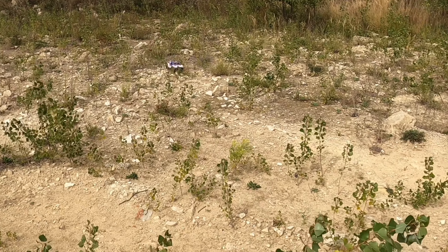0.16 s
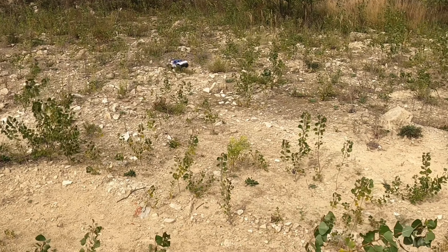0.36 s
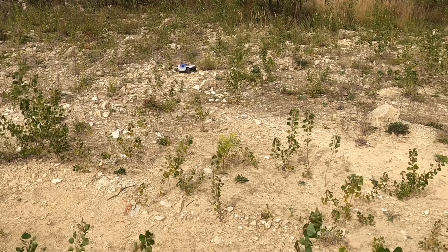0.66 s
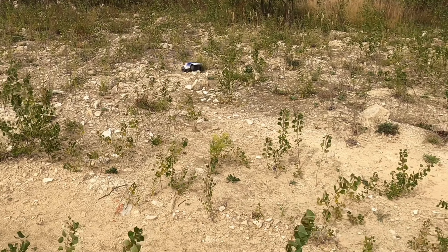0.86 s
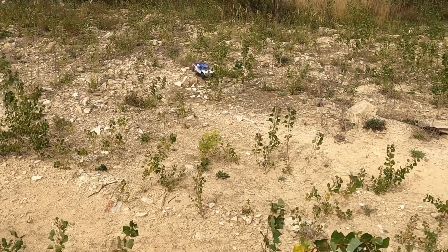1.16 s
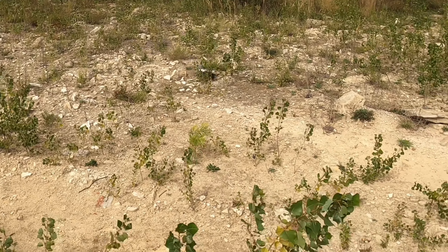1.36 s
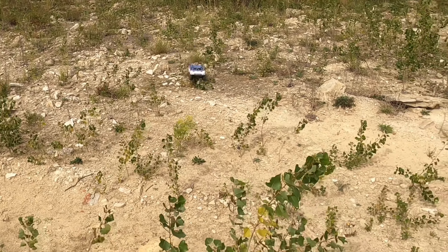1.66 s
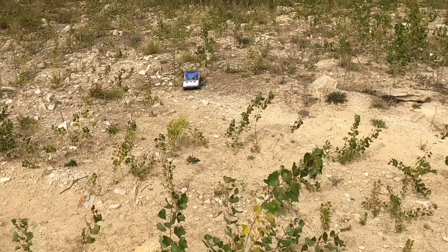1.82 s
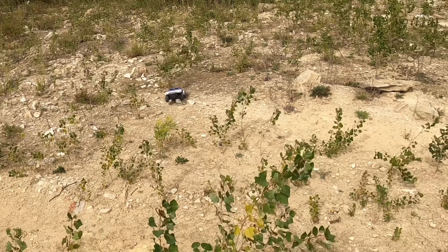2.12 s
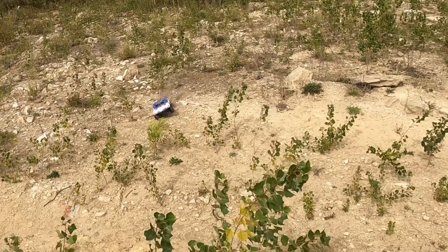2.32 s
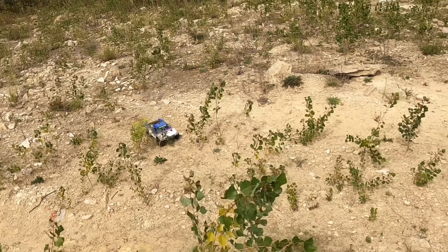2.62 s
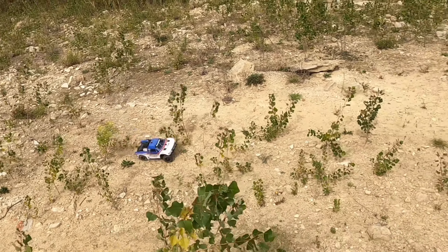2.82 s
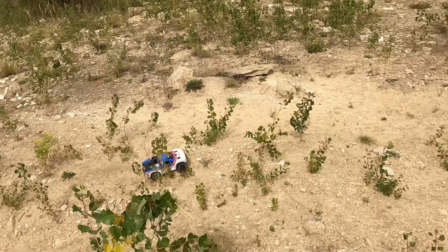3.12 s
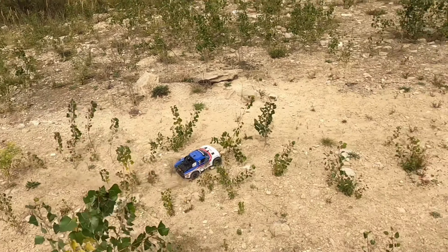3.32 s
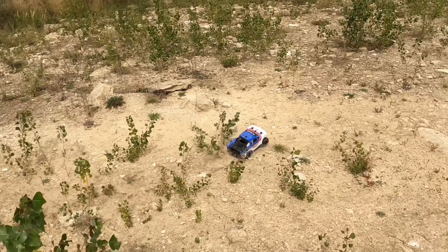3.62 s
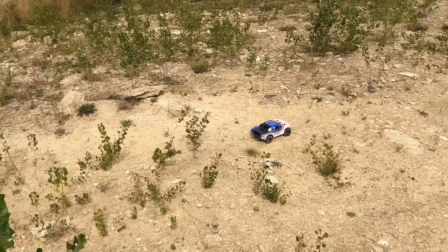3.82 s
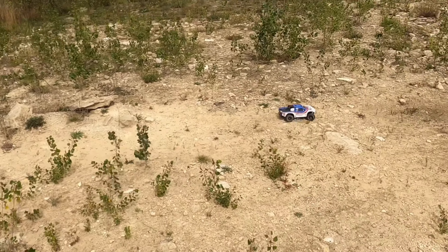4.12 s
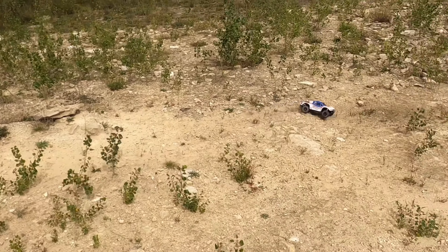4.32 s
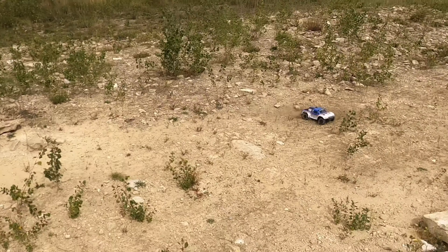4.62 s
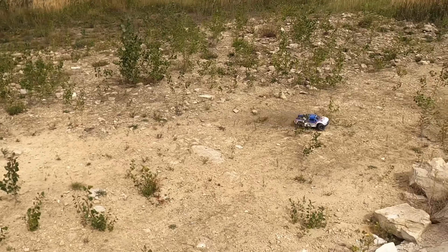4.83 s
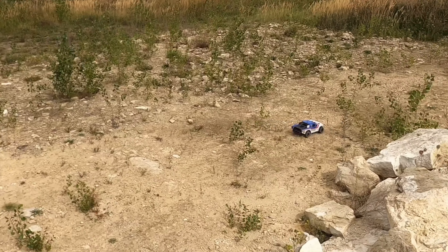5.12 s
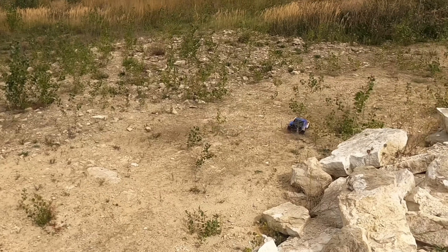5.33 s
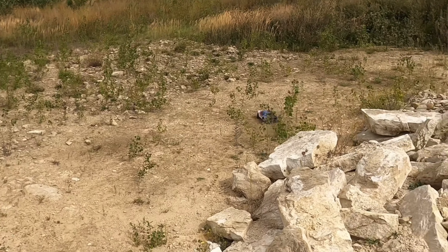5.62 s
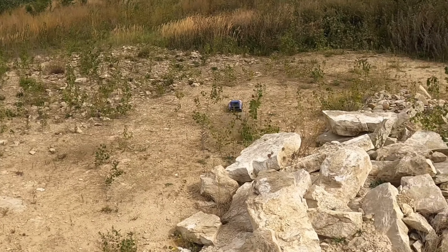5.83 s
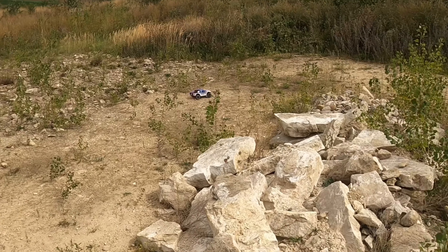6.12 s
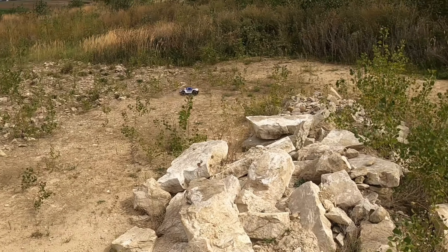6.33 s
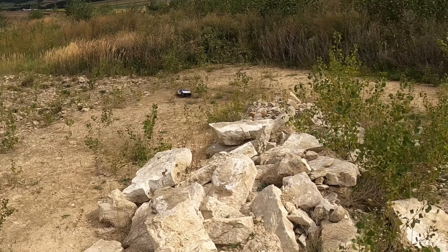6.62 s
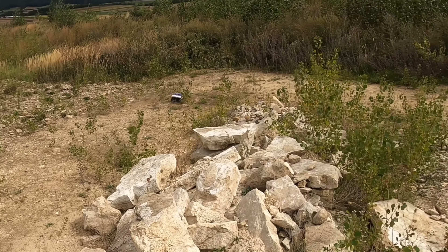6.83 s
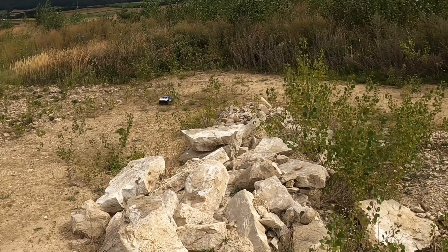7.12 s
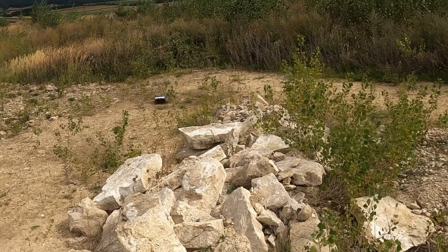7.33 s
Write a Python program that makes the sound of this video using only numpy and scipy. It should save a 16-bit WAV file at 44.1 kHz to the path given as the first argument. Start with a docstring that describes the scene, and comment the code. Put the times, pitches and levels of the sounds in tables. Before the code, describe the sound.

High motor and gear whine surges again and again as a little off-road truck hisses and rattles over grit, then fades under growing wind gusts.

```python
"""Outdoors on sand and stones, in wind: a small electric off-road truck runs before one mono microphone.
Its whine, motor and gear tones, starts high, sinks within a second, then surges again and again; a thin
coil whistle follows the controller's switching. Tyres and grit hiss, rasp and rumble as shaped noise, hardest
from about 3 to 4.5 s, while stones knock the resonant plastic shell. From 4 s lumpy low-frequency wind noise
grows on the microphone; near 7 s the truck is quieter and the gusts go on to the end."""
import sys
import numpy as np
from scipy import signal
from scipy.fft import rfft, irfft, next_fast_len
from scipy.io import wavfile
from scipy.ndimage import uniform_filter1d, map_coordinates

SR = 44100
rng = np.random.default_rng(int(sys.argv[2]) if len(sys.argv) > 2 else 0)


def int16_out(signal):
    """Quantize to a 16-bit WAV file."""
    q = np.round(np.clip(np.atleast_2d(signal).T, -1, 1) * 32767)
    wavfile.write(sys.argv[1], SR, q.astype(np.int16))


N = 328986

# Wind at the microphone: start_s, buffet_db, flutter_db (relative to the buffet)
WIND_LEVELS = [(0.0, -39, 6), (0.06, -23.5, -8.5), (0.21, -38, -8), (0.39, -34.5, -11), (0.56, -31, -5),
               (0.6, -22, -5), (0.79, -40, -7.5), (1.1, -25, -8.5), (1.29, -30, -16), (1.33, -46, 1.5),
               (1.43, -30.5, -9.5), (1.58, -48.5, -6), (2.01, -37.5, -8), (2.06, -44, -2),
               (2.35, -30.5, -9), (2.43, -21.5, -28), (2.47, -26.5, -12.5), (3.07, -38.5, -6),
               (3.12, -28, -8.5), (3.18, -53, 12.5), (3.28, -44.5, -1.5), (3.66, -30.5, -1.5),
               (3.74, -25.5, -3), (3.8, -21.5, -25), (3.95, -29.5, -15), (3.99, -47, 1), (4.05, -20, -8),
               (4.09, -31.5, -8.5), (4.24, -26.5, -2.5), (4.3, -30.5, -8), (4.45, -20, -1),
               (4.86, -25.5, -15.5), (4.88, -22.5, -16.5), (4.97, -23, -5.5), (5.05, -19.5, -20),
               (5.15, -39, -2), (5.38, -24.5, -14), (5.48, -23, 1.5), (5.59, -24, -17), (5.74, -30.5, 1.5),
               (5.77, -23.5, 0.5), (5.86, -27.5, -8.5), (6.0, -20, -0.5), (6.19, -20.5, 0),
               (6.3, -19.5, -7), (6.38, -22.5, 2.5), (6.46, -17, -15.5), (6.54, -20, -4.5), (6.59, -19, -5),
               (6.82, -24.5, -23), (6.94, -20, -16.5), (7.04, -24, -5.5), (7.1, -19.5, -18),
               (7.27, -34.5, 8.5), (7.31, -19.5, -5.5), (7.46, -25.5, 4)]
# Spectrum of the low wind buffet: frequency_hz, relative_level_db (per Hz)
BUFFET_SPECTRUM = [(12, -11), (25, 3), (45, 3), (80, -2), (130, -8), (250, -32), (400, -74)]
# Spectrum of the slightly higher wind flutter: frequency_hz, relative_level_db (per Hz)
FLUTTER_SPECTRUM = [(70, -1), (120, 0.5), (200, -3), (300, -13), (500, -29), (900, -78)]
# Rolling noise before the jolts: start_s, gear_rasp_db, chassis_rumble_db, thrown_sand_db
ROLLING_LEVELS = [(0.0, -41.5, -45, -58), (0.14, -41.5, -38.5, -60), (0.23, -47.5, -52, -69),
                  (0.35, -47.5, -39, -64), (0.54, -42, -47, -63.5), (0.73, -48, -34, -60.5),
                  (0.77, -57, -44, -77), (0.83, -47.5, -48.5, -86), (0.87, -56, -38.5, -59),
                  (0.89, -45, -41, -66), (0.98, -46.5, -47.5, -70), (1.14, -38, -39.5, -56.5),
                  (1.39, -41.5, -43, -68), (1.41, -35.5, -31, -62), (1.56, -43.5, -50.5, -61),
                  (1.6, -42, -42, -60), (1.7, -36.5, -47.5, -56), (1.95, -42, -41, -54.5),
                  (1.97, -34.5, -34.5, -48), (2.12, -46.5, -48, -67), (2.18, -48, -40, -75),
                  (2.22, -41.5, -42, -66), (2.39, -37, -41.5, -60), (2.53, -42.5, -42.5, -62),
                  (2.72, -39.5, -39.5, -67), (2.8, -48.5, -46, -60), (2.89, -40, -38.5, -60),
                  (2.99, -40, -34.5, -53.5), (3.14, -40.5, -44.5, -54), (3.16, -38, -29.5, -58),
                  (3.28, -38.5, -38.5, -57.5), (3.47, -34, -34.5, -47.5), (3.53, -36.5, -32, -56),
                  (3.57, -30, -34.5, -46), (3.66, -34.5, -38, -52), (3.72, -35.5, -30, -49.5),
                  (3.78, -35, -39, -66), (3.89, -33.5, -33, -60), (4.03, -42, -42.5, -65),
                  (4.07, -32.5, -29.5, -51), (4.13, -34, -37, -67), (4.28, -30.5, -30.5, -52),
                  (4.32, -34.5, -35, -57), (4.45, -41.5, -34.5, -67), (4.76, -36, -37.5, -60),
                  (4.88, -46.5, -48.5, -79), (5.03, -36, -35, -79), (5.13, -33, -34, -59),
                  (5.34, -41.5, -41, -72), (5.42, -34.5, -40, -59.5), (5.69, -33, -39.5, -56.5),
                  (5.92, -44, -40.5, -78), (6.21, -39, -32, -63), (6.28, -40.5, -40, -70),
                  (6.34, -35, -25, -63), (6.44, -38.5, -36, -77), (6.59, -39.5, -37.5, -69),
                  (6.92, -49.5, -48.5, -69.5), (7.17, -49, -50.5, -78), (7.46, -40, -40.5, -61)]
# Spectrum of the gear and tyre rasp: frequency_hz, relative_level_db (per Hz)
RASP_SPECTRUM = [(880, 9), (1500, 0.5), (1740, -1), (1930, 9.5), (2260, 9.5), (2680, 6.5), (3040, 6.5),
                 (3630, 4.5), (5070, -2.5), (7390, -17.5), (7700, -20.5), (10000, -22.5), (16900, -120)]
# Spectrum of the chassis rumble: frequency_hz, relative_level_db (per Hz)
RUMBLE_SPECTRUM = [(180, -3), (300, -1), (428, -0.5), (513, -0.5), (788, -5.5), (972, -9), (1180, -12),
                   (1470, -16.5), (1700, -14), (2210, -37), (3740, -120)]
# Spectrum of thrown sand: frequency_hz, relative_level_db (per Hz)
SAND_SPECTRUM = [(5000, -9), (7000, -6), (9000, -8), (11000, -10.5), (13000, -17.5), (14500, -27),
                 (15600, -38)]
# Spectrum of the ringing motor can: frequency_hz, relative_level_db (per Hz)
CAN_SPECTRUM = [(4200, -9), (4800, -6), (5200, -5.5), (5600, -13), (6400, -13)]
# Knocks on stones, before the shell: start_s, clack_db, thud_db and high_clack_db (relative to the clack)
KNOCK_TIMES = [(0.141, -14.5, 5, -8), (.151, -21, 10, -17), (.318, -17.5, 10.5, -19), (.337, -23, 13, -15),
               (.489, -25.5, 11, -8), (0.68, -27, 6, -2), (.716, -10.5, 0.5, -25), (.742, -16.5, -2, -16),
               (.862, -15, 4, -16), (1.403, -11, -5, -5), (1.419, -6, 7.5, -15), (1.927, -10, -2, -18),
               (1.972, 2.5, -4, -18), (2.027, -5, -5.5, -15), (2.185, -14, 3, -13), (2.2, -5.5, -0.5, -18),
               (2.406, -9, -26, -14), (2.575, -27, 13, -15), (2.659, -24, 14.5, -17), (2.673, -12, -3, -15),
               (2.704, -21, 13, -15), (2.766, -17, 8, -27), (3.064, -21, -10, 1), (3.454, -1, 0, -16),
               (3.474, -6, -12, -15), (3.489, -5, -2, -17.5), (3.514, -2.5, -15, -14.5),
               (3.556, -10, -10, -12), (3.566, -2, -12, -16), (3.975, -4.5, -10, -16),
               (4.057, -8, -5, -6.5), (4.072, -19.5, 17.5, -9), (4.09, -12.5, -12, -1),
               (4.263, -22, -10, -14), (4.286, -9, -13, -8), (4.385, -8, -2, -20), (4.411, -14.5, 17, -6),
               (4.473, -6, 7, -21), (4.56, -21, 13.5, -20), (4.769, -15, -15, -8), (4.907, -12, -3, -28),
               (4.95, -28, 17, -16), (5.655, -1, -13, -12), (6.11, -25, -5, 3), (6.328, -9, -6, -13),
               (6.38, -20, 12, -17), (6.53, -9, -17, -13), (6.741, -19, 10, -16), (7.22, -20, -10, -31)]
# Plastic shell resonances, two each for thud, clack, high clack: frequency_hz, width_hz, level_db
SHELL_MODES = [(512, 113, -2), (934, 230, -3), (1950, 440, -7.5), (3200, 170, -5), (3850, 390, 5.5),
               (5000, 1300, 2)]
# Switching tone, higher as the truck comes, lower as it leaves: start_s, pitch_hz
WHISTLE_PITCH = [(0.0, 8050.0), (0.5, 8035.0), (1.2, 8060.0), (1.8, 8035.0), (2.3, 8075.0), (2.9, 8070.0),
                 (3.5, 7990.0), (4.2, 7920.0), (4.5, 7960.0), (4.95, 8030.0), (5.5, 7945.0), (6.1, 7890.0),
                 (6.6, 7940.0), (7.0, 8000.0), (7.46, 8030.0)]
# Strength of the switching tone, all but silent while coasting: start_s, rms_level_db
WHISTLE_LEVEL = [(0, -60), (.18, -83), (.3, -68), (.58, -65), (.71, -85), (.8, -70), (1.2, -66),
                 (1.52, -71), (1.7, -64), (2.2, -72), (3.0, -64), (4.33, -62), (4.43, -84), (4.55, -72),
                 (5.5, -62), (6.2, -70), (6.5, -73), (7.3, -78), (7.46, -80)]
# How well the shell radiates a tone: frequency_hz, gain_db
SHELL_RADIATION = [(600, -2), (860, -2), (980, 4), (1100, -1), (1300, -5), (1800, -6), (2100, -2),
                   (2500, 0), (3200, -1), (3800, -8), (4600, -11), (5200, -5), (6000, -10), (7000, -22),
                   (11000, -34)]
# Drive as the throttle is worked and wheels grip or slip, levels before the shell: start_s, whine_pitch_hz,
# mesh_db, mesh_octave_db, whine_db, whine_octave_db, whine_third_multiple_db
DRIVE_STATE = [(0.0, 1640.0, -51.0, -52.0, -34.0, -45.0, -45.0),
               (0.04, 1560.0, -55.0, -50.0, -34.0, -48.0, -41.0),
               (0.1, 1550.0, -48.0, -50.0, -55.0, -45.0, -38.0),
               (0.13, 1470.0, -57.0, -48.0, -54.0, -52.0, -39.0),
               (0.17, 970.0, -54.0, -54.0, -56.0, -48.0, -53.0),
               (0.25, 860.0, -53.0, -53.0, -46.0, -62.0, -66.0),
               (0.33, 950.0, -55.0, -47.0, -50.0, -52.0, -55.0),
               (0.45, 1040.0, -55.0, -50.0, -53.0, -47.0, -53.0),
               (0.5, 1250.0, -58.0, -39.0, -46.0, -62.0, -55.0),
               (0.53, 1400.0, -56.0, -48.0, -47.0, -46.0, -38.0),
               (0.57, 1430.0, -60.0, -53.0, -43.0, -46.0, -40.0),
               (0.62, 1530.0, -51.0, -54.0, -49.0, -47.0, -48.0),
               (0.7, 1340.0, -63.0, -49.0, -50.0, -59.0, -48.0),
               (0.74, 900.0, -52.0, -56.0, -54.0, -44.0, -57.0),
               (0.78, 450.0, -61.0, -66.0, -55.0, -64.0, -59.0),
               (0.8, 440.0, -45.0, -57.0, -58.0, -63.0, -59.0),
               (0.82, 455.0, -31.0, -52.0, -58.0, -63.0, -58.0),
               (0.833, 440.0, -42.0, -57.0, -57.0, -63.0, -57.0),
               (0.845, 570.0, -46.0, -60.0, -55.0, -59.0, -57.0),
               (0.865, 690.0, -42.0, -46.0, -42.0, -58.0, -61.0),
               (0.9, 750.0, -52.0, -53.0, -54.0, -60.0, -62.0),
               (0.94, 570.0, -58.0, -58.0, -57.0, -62.0, -58.0),
               (0.98, 430.0, -40.0, -47.0, -57.0, -64.0, -61.0),
               (1.0, 490.0, -40.0, -58.0, -56.0, -69.0, -59.0),
               (1.02, 580.0, -45.0, -49.0, -45.0, -62.0, -57.0),
               (1.05, 780.0, -44.0, -50.0, -49.0, -57.0, -59.0),
               (1.08, 960.0, -38.0, -40.0, -50.0, -44.0, -47.0),
               (1.1, 1050.0, -43.0, -38.0, -50.0, -41.0, -49.0),
               (1.115, 740.0, -39.0, -50.0, -54.0, -55.0, -56.0),
               (1.15, 1270.0, -43.0, -36.0, -53.0, -50.0, -50.0),
               (1.18, 1200.0, -45.0, -46.0, -43.0, -50.0, -43.0),
               (1.21, 1240.0, -47.0, -44.0, -38.0, -50.0, -36.0),
               (1.24, 1230.0, -49.0, -46.0, -53.0, -56.0, -52.0),
               (1.3, 960.0, -53.0, -49.0, -65.0, -43.0, -50.0),
               (1.38, 1010.0, -46.0, -43.0, -47.0, -44.0, -54.0),
               (1.435, 950.0, -52.0, -50.0, -54.0, -56.0, -54.0),
               (1.45, 900.0, -34.0, -48.0, -54.0, -56.0, -54.0),
               (1.462, 740.0, -36.0, -46.0, -54.0, -56.0, -54.0),
               (1.475, 700.0, -42.0, -52.0, -54.0, -56.0, -54.0),
               (1.487, 750.0, -37.0, -52.0, -54.0, -56.0, -54.0),
               (1.51, 720.0, -55.0, -56.0, -54.0, -56.0, -54.0),
               (1.6, 690.0, -60.0, -60.0, -49.0, -57.0, -46.0),
               (1.65, 740.0, -52.0, -56.0, -48.0, -54.0, -47.0),
               (1.668, 745.0, -31.0, -50.0, -44.0, -54.0, -47.0),
               (1.69, 850.0, -38.0, -50.0, -44.0, -46.0, -48.0),
               (1.71, 920.0, -30.0, -49.0, -46.0, -39.0, -49.0),
               (1.73, 980.0, -44.0, -46.0, -46.0, -38.0, -48.0),
               (1.77, 1210.0, -38.0, -38.0, -46.0, -41.0, -46.0),
               (1.85, 1310.0, -57.0, -39.0, -57.0, -45.0, -36.0),
               (1.9, 1360.0, -48.0, -38.0, -53.0, -47.0, -41.0),
               (2.0, 1350.0, -47.0, -38.0, -46.0, -52.0, -40.0),
               (2.05, 780.0, -48.0, -55.0, -45.0, -51.0, -47.0),
               (2.06, 720.0, -40.0, -56.0, -54.0, -56.0, -54.0),
               (2.075, 690.0, -59.0, -62.0, -59.0, -58.0, -59.0),
               (2.17, 500.0, -58.0, -60.0, -54.0, -56.0, -54.0),
               (2.2, 480.0, -41.0, -52.0, -43.0, -46.0, -51.0),
               (2.215, 560.0, -41.0, -50.0, -54.0, -56.0, -54.0),
               (2.235, 800.0, -39.0, -46.0, -55.0, -53.0, -56.0),
               (2.27, 970.0, -42.0, -52.0, -45.0, -40.0, -58.0),
               (2.33, 1260.0, -41.0, -47.0, -41.0, -49.0, -51.0),
               (2.43, 1410.0, -51.0, -46.0, -44.0, -45.0, -44.0),
               (2.5, 990.0, -54.0, -46.0, -61.0, -49.0, -60.0),
               (2.57, 740.0, -51.0, -52.0, -44.0, -59.0, -47.0),
               (2.62, 920.0, -49.0, -43.0, -52.0, -55.0, -54.0),
               (2.675, 980.0, -49.0, -39.0, -44.0, -56.0, -55.0),
               (2.7, 1020.0, -54.0, -38.0, -48.0, -48.0, -57.0),
               (2.8, 700.0, -64.0, -57.0, -57.0, -57.0, -58.0),
               (2.84, 485.0, -43.0, -58.0, -54.0, -54.0, -57.0),
               (2.88, 490.0, -30.0, -55.0, -47.0, -64.0, -55.0),
               (2.895, 640.0, -36.0, -52.0, -37.0, -46.0, -53.0),
               (2.915, 660.0, -35.0, -48.0, -53.0, -55.0, -55.0),
               (2.93, 850.0, -38.0, -46.0, -53.0, -54.0, -50.0),
               (2.97, 880.0, -34.0, -49.0, -43.0, -52.0, -56.0),
               (3.0, 980.0, -42.0, -33.0, -41.0, -50.0, -58.0),
               (3.03, 1200.0, -36.0, -40.0, -44.0, -41.0, -54.0),
               (3.1, 1250.0, -53.0, -40.0, -43.0, -38.0, -40.0),
               (3.18, 1240.0, -41.0, -43.0, -46.0, -36.0, -43.0),
               (3.26, 1230.0, -49.0, -46.0, -48.0, -41.0, -42.0),
               (3.3, 970.0, -50.0, -36.0, -38.0, -52.0, -42.0),
               (3.35, 1050.0, -46.0, -43.0, -39.0, -43.0, -47.0),
               (3.37, 1250.0, -54.0, -42.0, -44.0, -36.0, -48.0),
               (3.43, 1210.0, -44.0, -35.0, -50.0, -43.0, -47.0),
               (3.46, 760.0, -35.0, -46.0, -36.0, -46.0, -36.0),
               (3.49, 740.0, -46.0, -52.0, -48.0, -47.0, -49.0),
               (3.512, 750.0, -32.0, -52.0, -48.0, -47.0, -49.0),
               (3.57, 1100.0, -44.0, -38.0, -39.0, -34.0, -48.0),
               (3.635, 1230.0, -45.0, -39.0, -43.0, -39.0, -39.0),
               (3.695, 1250.0, -38.0, -40.0, -47.0, -47.0, -48.0),
               (3.85, 840.0, -48.0, -45.0, -46.0, -47.0, -51.0),
               (3.89, 620.0, -41.0, -55.0, -38.0, -48.0, -47.0),
               (3.93, 560.0, -32.0, -37.0, -50.0, -54.0, -49.0),
               (3.98, 560.0, -31.0, -32.0, -44.0, -55.0, -50.0),
               (4.03, 560.0, -35.0, -33.0, -52.0, -56.0, -51.0),
               (4.06, 640.0, -33.0, -39.0, -46.0, -49.0, -48.0),
               (4.12, 720.0, -31.0, -47.0, -34.0, -49.0, -39.0),
               (4.16, 830.0, -34.0, -47.0, -36.0, -49.0, -51.0),
               (4.2, 970.0, -37.0, -32.0, -34.0, -38.0, -50.0),
               (4.27, 1010.0, -39.0, -35.0, -31.0, -38.0, -48.0),
               (4.36, 950.0, -49.0, -38.0, -41.0, -51.0, -51.0),
               (4.45, 1010.0, -52.0, -56.0, -46.0, -52.0, -55.0),
               (4.56, 600.0, -48.0, -54.0, -46.0, -54.0, -45.0),
               (4.62, 660.0, -41.0, -51.0, -36.0, -53.0, -53.0),
               (4.67, 750.0, -39.0, -49.0, -40.0, -52.0, -43.0),
               (4.72, 830.0, -44.0, -42.0, -41.0, -50.0, -50.0),
               (4.8, 1030.0, -46.0, -45.0, -48.0, -41.0, -53.0),
               (4.88, 1000.0, -57.0, -48.0, -54.0, -48.0, -63.0),
               (4.91, 740.0, -47.0, -67.0, -51.0, -57.0, -48.0),
               (4.94, 850.0, -38.0, -59.0, -56.0, -54.0, -58.0),
               (4.965, 880.0, -45.0, -58.0, -55.0, -49.0, -56.0),
               (4.98, 500.0, -52.0, -58.0, -49.0, -51.0, -50.0),
               (5.012, 520.0, -30.0, -42.0, -46.0, -47.0, -49.0),
               (5.043, 610.0, -32.0, -36.0, -40.0, -52.0, -48.0),
               (5.05, 840.0, -36.0, -44.0, -41.0, -49.0, -50.0),
               (5.062, 700.0, -31.0, -43.0, -42.0, -50.0, -50.0),
               (5.078, 820.0, -30.0, -40.0, -39.0, -48.0, -51.0),
               (5.105, 1020.0, -46.0, -40.0, -34.0, -42.0, -50.0),
               (5.125, 1230.0, -35.0, -40.0, -48.0, -40.0, -47.0),
               (5.17, 1000.0, -48.0, -42.0, -39.0, -41.0, -52.0),
               (5.3, 810.0, -57.0, -54.0, -54.0, -51.0, -47.0),
               (5.36, 530.0, -39.0, -48.0, -55.0, -59.0, -52.0),
               (5.383, 580.0, -32.0, -42.0, -45.0, -56.0, -52.0),
               (5.398, 700.0, -39.0, -35.0, -46.0, -52.0, -53.0),
               (5.417, 685.0, -36.0, -35.0, -46.0, -52.0, -53.0),
               (5.432, 585.0, -31.0, -36.0, -40.0, -46.0, -50.0),
               (5.448, 820.0, -41.0, -51.0, -52.0, -50.0, -52.0),
               (5.462, 770.0, -32.0, -51.0, -52.0, -50.0, -52.0),
               (5.48, 720.0, -37.0, -51.0, -52.0, -50.0, -52.0),
               (5.52, 980.0, -50.0, -42.0, -43.0, -39.0, -52.0),
               (5.55, 1000.0, -35.0, -40.0, -47.0, -39.0, -44.0),
               (5.58, 1290.0, -35.0, -41.0, -40.0, -40.0, -44.0),
               (5.62, 1000.0, -44.0, -40.0, -40.0, -37.0, -51.0),
               (5.7, 990.0, -45.0, -40.0, -45.0, -40.0, -50.0),
               (5.77, 960.0, -38.0, -48.0, -41.0, -39.0, -54.0),
               (5.8, 720.0, -43.0, -37.0, -41.0, -50.0, -43.0),
               (5.93, 760.0, -45.0, -46.0, -42.0, -52.0, -45.0),
               (6.0, 680.0, -45.0, -62.0, -50.0, -52.0, -43.0),
               (6.1, 890.0, -43.0, -43.0, -39.0, -45.0, -56.0),
               (6.2, 1120.0, -44.0, -46.0, -43.0, -44.0, -47.0),
               (6.3, 1330.0, -49.0, -46.0, -37.0, -46.0, -35.0),
               (6.318, 990.0, -45.0, -40.0, -41.0, -39.0, -52.0),
               (6.4, 990.0, -50.0, -52.0, -44.0, -43.0, -55.0),
               (6.45, 1130.0, -50.0, -52.0, -41.0, -44.0, -50.0),
               (6.52, 990.0, -48.0, -44.0, -39.0, -46.0, -53.0),
               (6.6, 900.0, -52.0, -54.0, -42.0, -51.0, -56.0),
               (6.69, 1210.0, -48.0, -51.0, -50.0, -46.0, -55.0),
               (6.75, 920.0, -45.0, -48.0, -43.0, -44.0, -61.0),
               (6.82, 850.0, -62.0, -53.0, -49.0, -57.0, -64.0),
               (6.9, 1000.0, -52.0, -55.0, -67.0, -58.0, -58.0),
               (7.0, 800.0, -57.0, -63.0, -55.0, -61.0, -54.0),
               (7.08, 780.0, -55.0, -62.0, -54.0, -56.0, -54.0),
               (7.097, 740.0, -44.0, -62.0, -54.0, -56.0, -54.0),
               (7.112, 550.0, -44.0, -62.0, -54.0, -56.0, -54.0),
               (7.13, 530.0, -48.0, -66.0, -54.0, -56.0, -54.0),
               (7.163, 740.0, -45.0, -60.0, -54.0, -56.0, -54.0),
               (7.182, 510.0, -44.0, -62.0, -54.0, -56.0, -54.0),
               (7.2, 420.0, -50.0, -64.0, -54.0, -56.0, -54.0),
               (7.221, 470.0, -33.0, -60.0, -54.0, -56.0, -54.0),
               (7.238, 740.0, -38.0, -52.0, -54.0, -56.0, -54.0),
               (7.255, 790.0, -39.0, -52.0, -54.0, -56.0, -54.0),
               (7.27, 790.0, -54.0, -52.0, -54.0, -56.0, -54.0),
               (7.3, 1000.0, -55.0, -44.0, -57.0, -50.0, -61.0),
               (7.46, 1050.0, -55.0, -55.0, -50.0, -47.0, -54.0)]

CAN_DB = -11  # fullest ring of the motor can, against the rasp
SAND_USUAL_DB = -24  # usual level of the sand against the rasp
SNAP_DB = 17  # first contact of a knock, over its rattle
SPRAY_DB = -42  # sand thrown by a knock, against its clack
DULL_HZ = 9000  # the shell passes little above this
MESH = 4.16  # tooth rate over whine pitch
UPPER_DB = -6  # fifth and sixth multiples against the third
FLICKER_DB = 1.2  # scale of the unsteadiness of each motor tone
TOP_HZ = 15600  # upper band limit of the microphone signal


def amp(db):
    """Turn decibels into gain."""
    return 10 ** (np.asarray(db) / 20)


def unit(x):
    """Scale a signal to rms 1."""
    return x / np.sqrt(np.mean(x ** 2) + 1e-20)


def curves(rows):
    """Draw one straight-line curve over the scene for each column after start_s."""
    start_s, *columns = np.transpose(rows)
    time_s = np.arange(N) / SR
    return [np.interp(time_s, start_s, column) for column in columns]


def wobble(rate):
    """Draw a smooth random curve with this many knots a second."""
    knots = rng.standard_normal(int(N * rate / SR) + 4)
    return map_coordinates(knots, [np.arange(N) * rate / SR])


def filtered(x, response):
    """Multiply the spectrum of x by a response given as a function of frequency in Hz."""
    size = next_fast_len(N + SR // 2)  # padded, so the tail does not wrap round
    return irfft(rfft(x, size) * response(np.fft.rfftfreq(size, 1 / SR)), size)[:N]


def coloured(x, spectrum):
    """Shape x by (Hz, dB) points joined on a log-frequency axis, at rms 1."""
    point_hz, point_db = np.transpose(spectrum)

    def response(hz):
        return amp(np.interp(np.log(hz + 1), np.log(point_hz + 1), point_db, -120, -120))

    return unit(filtered(x, response))


def ring(x, modes):
    """Pass x through parallel band-pass resonances whose signs alternate."""
    def response(hz):
        total = 0
        for k, (centre_hz, width_hz, db) in enumerate(modes):
            damping = 1j * hz * width_hz
            total = total + (-1) ** k * amp(db) * damping / (centre_hz ** 2 - hz ** 2 + damping)
        return total

    return filtered(x, response)


def patchy(depth_db):
    """Make white noise with patches of random gain in time and frequency."""
    grid = signal.stft(rng.standard_normal(N + SR // 20), nperseg=256)[2]
    patches = uniform_filter1d(rng.standard_normal(grid.shape), 4, 0)  # smooth over frequency
    patches = uniform_filter1d(patches, 5, 1)  # smooth over time
    return signal.istft(grid * amp(depth_db * unit(patches)), nperseg=256)[1][:N]


def grit(per_s):
    """Scatter tiny random impacts of varied size, per_s of them a second on average."""
    hit = rng.random(N) < per_s / SR
    return unit(hit * rng.standard_normal(N))


def tone(hz, db, clean, blur_hz):
    """Make a partial: a share of clean sine, the rest noise in a narrow band around it."""
    phase = 2 * np.pi * np.cumsum(hz) / SR
    fuzz = unit(wobble(blur_hz)) * np.sin(phase) + unit(wobble(blur_hz)) * np.cos(phase)
    return amp(db) * (np.sqrt(2 * clean) * np.sin(phase) + np.sqrt(1 - clean) * fuzz)


def wind():
    """Turbulence on the microphone port comes in shared lumps, low buffet and higher flutter."""
    buffet_db, flutter_db = curves(WIND_LEVELS)
    lumps = wobble(18)
    buffet = coloured(rng.standard_normal(N), BUFFET_SPECTRUM)
    buffet = unit(amp(0.54 * lumps) * buffet)
    flutter = coloured(rng.standard_normal(N), FLUTTER_SPECTRUM)
    flutter = unit(amp(0.78 * lumps + 3.4 * wobble(35)) * flutter)
    return amp(buffet_db) * (buffet + amp(flutter_db) * flutter)


def rolling():
    """Rough ground jolts all rolling layers together; grit rides on the gear and tyre noise."""
    rasp_db, rumble_db, sand_db = curves(ROLLING_LEVELS)
    jolt_db = 1.03 * wobble(12) + 0.22 * wobble(25) + 0.11 * wobble(77)
    stones = grit(per_s=200)
    rasp = coloured(patchy(depth_db=3.0) + 0.29 * stones, RASP_SPECTRUM)
    rumble = coloured(patchy(depth_db=3.5) + 0.5 * stones + 0.3 * grit(per_s=40), RUMBLE_SPECTRUM)
    sand = coloured(patchy(depth_db=4.0) + 0.58 * stones + 0.32 * grit(per_s=1500), SAND_SPECTRUM)
    can = coloured(patchy(depth_db=7.0), CAN_SPECTRUM)
    # The can stands out only under load: it weakens dB for dB as the sand falls below usual
    can_db = CAN_DB + np.minimum(sand_db - rasp_db - SAND_USUAL_DB, 0)
    gears = amp(rasp_db) * (rasp + amp(can_db) * can)
    chassis = amp(rumble_db + 1.3 * wobble(14)) * rumble
    return amp(jolt_db) * (gears + chassis + amp(sand_db) * sand)


def knocks():
    """Each stone snaps and rattles the shell: low modes thud, higher modes clack, sand sprays."""
    t = np.arange(SR // 20) / SR
    # Rows: thud, clack, high clack, sand spray
    fall_60db_s = np.array([[.03], [.022], [.02], [.025]])
    attack_s = np.array([[.001], [.0005], [.0005], [.003]])
    shape = amp(-60 * t / fall_60db_s) * (1 - np.exp(-t / attack_s))
    blows = np.zeros((4, N + len(t)))
    for start_s, clack_db, thud_db, high_db in KNOCK_TIMES:
        start = round(start_s * SR)
        level = amp(clack_db + np.array([[thud_db], [0], [high_db], [SPRAY_DB]]))
        blows[:, start:start + len(t)] += level * shape * rng.standard_normal((4, len(t)))
        blows[:3, start + SR // 2000] += amp(SNAP_DB) * level[:3, 0]  # snap half a millisecond in
    shell = sum(ring(blows[k, :N], SHELL_MODES[2 * k:2 * k + 2]) for k in range(3))
    shell = filtered(shell, lambda hz: 1 / (1 + 1j * hz / DULL_HZ) ** 4)
    spray = coloured(blows[3, :N], SAND_SPECTRUM) * np.std(blows[3])
    return shell + spray


def controller():
    """The motor coils sing at the speed controller's switching rate."""
    return tone(curves(WHISTLE_PITCH)[0], curves(WHISTLE_LEVEL)[0], clean=.3, blur_hz=55)


def motor():
    """Bumps shake the gears, so whine and tooth tones warble, bead and smear; an uneven gear pulses high ones."""
    hz, mesh_db, mesh_octave_db, whine_db, octave_db, third_db = curves(DRIVE_STATE)
    hz = uniform_filter1d(hz, SR // 200)  # ease the pitch over 5 ms
    hz = hz * (1 + .016 * wobble(50) + .015 * wobble(110))
    gear_turn = 2 * np.pi * np.cumsum(hz) / SR / 3
    beads = unit(amp(3.2 * wobble(70)) * (1 + .4 * np.sin(gear_turn)))
    upper_db = third_db + UPPER_DB
    # Multiple of the whine pitch, level in dB, share of clean sine, blur in knots a second
    partials = [(1, whine_db, .35, 130), (2, octave_db, .28, 180), (3, third_db, .3, 160),
                (MESH, mesh_db, .62, 200), (2 * MESH, mesh_octave_db, .38, 260),
                (5, upper_db, .3, 180), (6, upper_db, .3, 200)]
    total = np.zeros(N)
    for multiple, db, clean, blur_hz in partials:
        shell_db = np.interp(multiple * hz, *np.transpose(SHELL_RADIATION))
        level_db = db + shell_db + FLICKER_DB * wobble(30)
        partial = tone(multiple * hz, level_db, clean, blur_hz)
        total += beads * partial if multiple > 2 else partial
    return total


def scene():
    """Wind and truck add up at one microphone, with no echo from the place."""
    return (wind() + rolling() + knocks() + controller() + motor())[None]


def record(dry):
    """The microphone signal keeps nothing above its band limit."""
    return filtered(dry[0], lambda hz: hz < TOP_HZ)[None]


dry = scene()
out = record(dry)
int16_out(out)
```